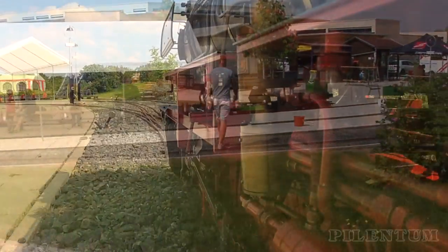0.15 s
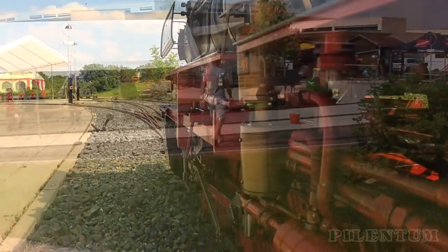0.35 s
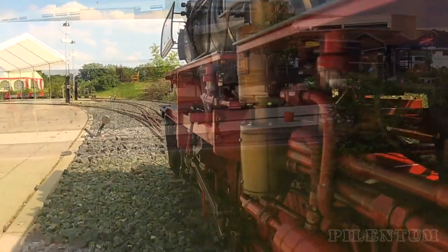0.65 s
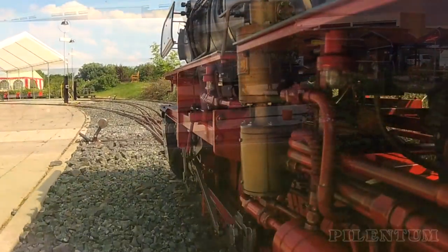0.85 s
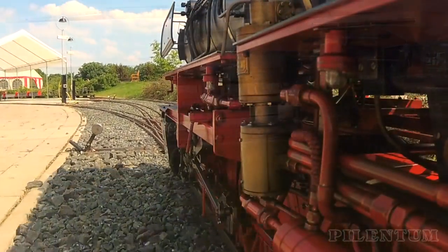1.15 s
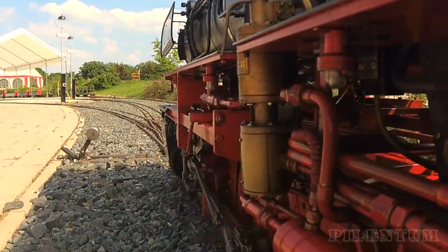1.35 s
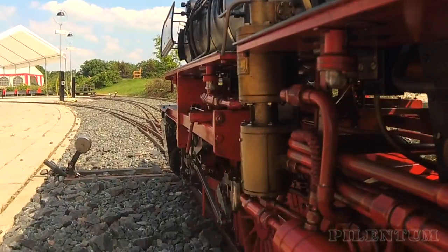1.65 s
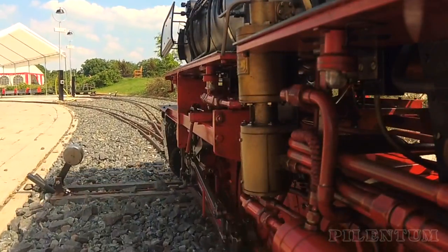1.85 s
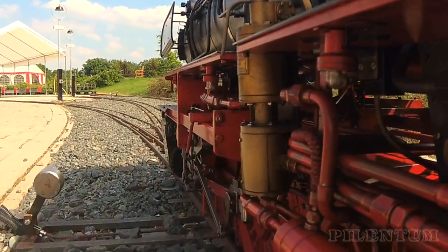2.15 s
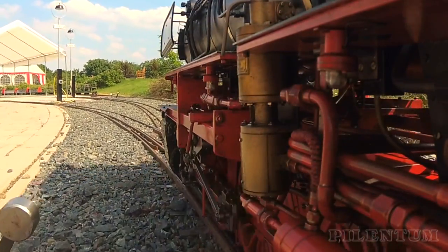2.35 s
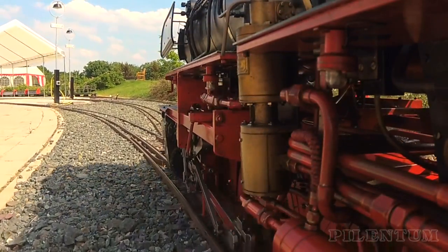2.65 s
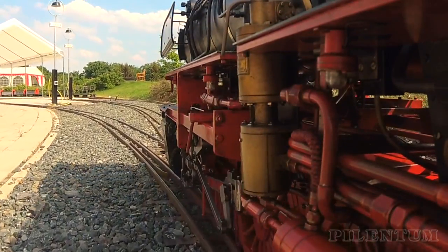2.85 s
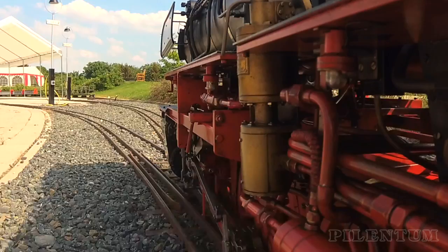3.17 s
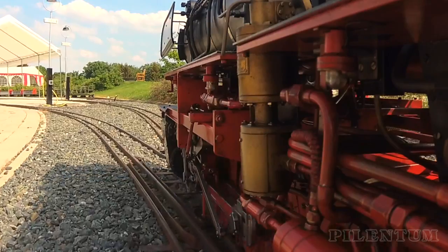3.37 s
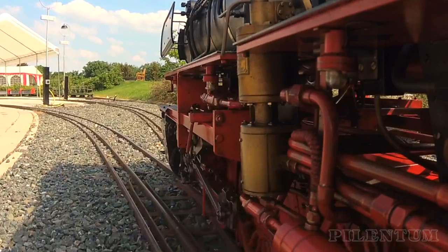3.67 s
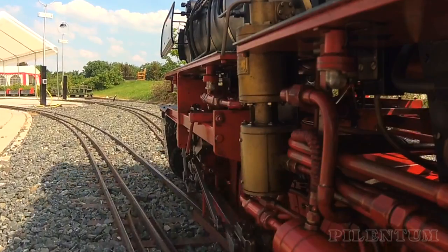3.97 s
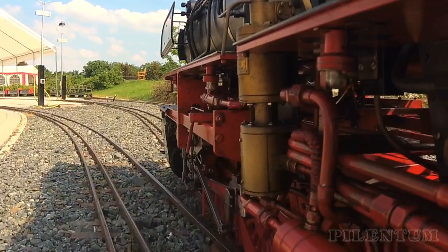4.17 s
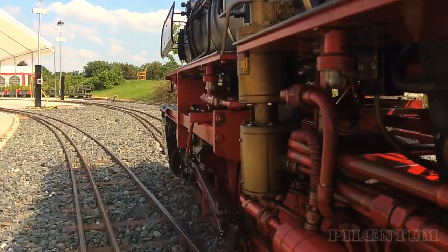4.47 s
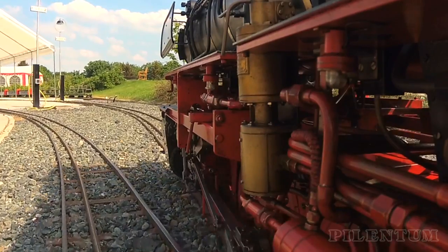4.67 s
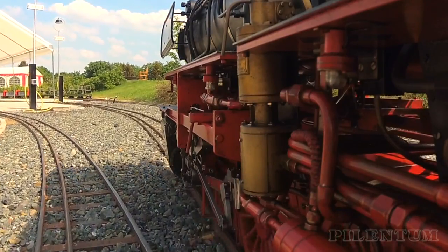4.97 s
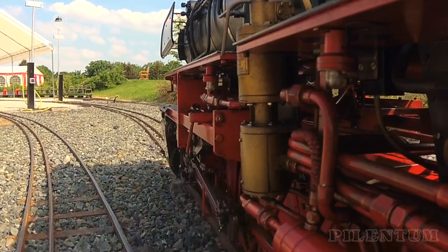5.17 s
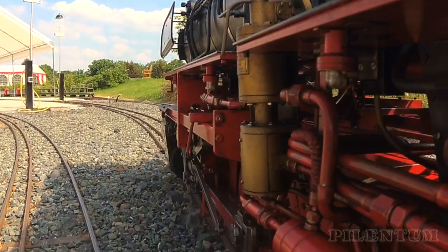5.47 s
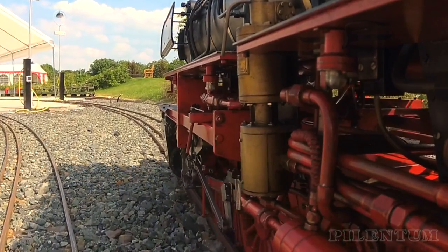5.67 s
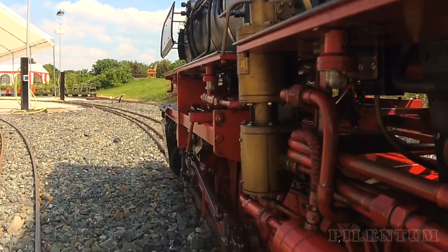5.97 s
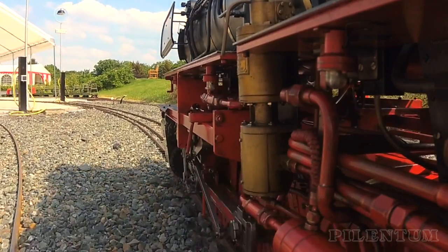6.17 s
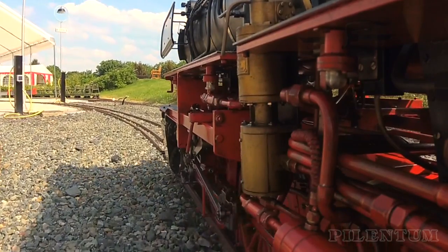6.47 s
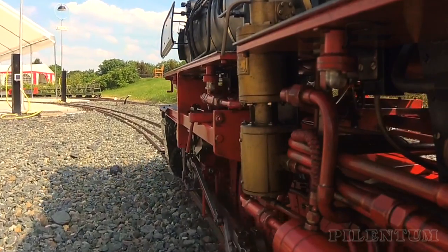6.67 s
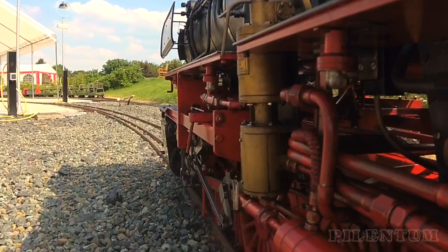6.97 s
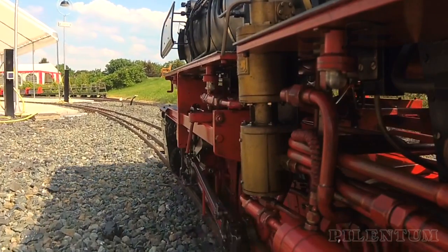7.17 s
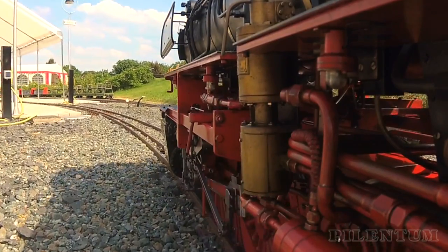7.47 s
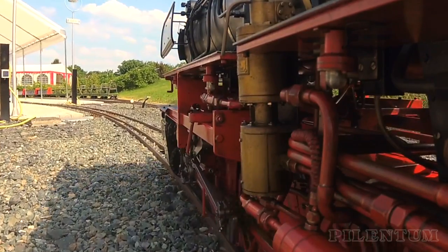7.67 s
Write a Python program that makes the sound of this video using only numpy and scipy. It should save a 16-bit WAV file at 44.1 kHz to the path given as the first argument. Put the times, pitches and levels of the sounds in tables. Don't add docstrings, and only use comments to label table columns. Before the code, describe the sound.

Outdoors, a miniature steam locomotive's passing rumble and airy hiss fade within about a second, revealing its running gear from a microphone mounted against the frame. Muffled wheel roughness pulses quickly with the rods, broken by irregular knocks, clanks and little clinks. A cluster of hard blows peaks at three and a half seconds, then rolling calms, with thin steam hiss, brief brake scrapes and faint very high flange squeak to the end.

```python
import sys
import numpy as np
from scipy import signal
from scipy.fft import rfft, irfft
from scipy.io import wavfile
from scipy.ndimage import uniform_filter1d, map_coordinates

SR = 44100
rng = np.random.default_rng(int(sys.argv[2]) if len(sys.argv) > 2 else 0)


def makeup_ratio(level_db):
    decades = np.asarray(level_db, float) / 20
    return 10 ** decades


def store_pcm(level_fs):
    pcm = np.round(np.clip(level_fs, -1, 1) * 32767).astype(np.int16)
    wavfile.write(sys.argv[1], SR, np.atleast_2d(pcm).T)


N = 345303
T = np.arange(N) / SR
CASE_HZ, TOP_HZ = 1800, 14400


def unit(x):
    return x / np.sqrt(np.mean(x ** 2))


def curve(rows):
    s, *columns = np.transpose(rows)
    return [np.interp(T, s, c) for c in columns]


def walk(rate):
    hold = int(SR / rate)
    steps = np.repeat(rng.standard_normal(N // hold + 1), hold)
    return 1.3 * uniform_filter1d(uniform_filter1d(steps, hold), hold)[:N]


def rough(rate, scatter_db, smear_ms):
    sizes = makeup_ratio(scatter_db * np.minimum(rng.exponential(size=N), 3))
    hits = (rng.random(N) < rate / SR) * sizes
    pole = np.exp(-1000 / (smear_ms * SR))
    return unit(np.sqrt(signal.lfilter([1], [1, -pole], hits ** 2) + 1e-9))


def shake(steady, s, db, ms, rise, strike):
    chatter, first = steady + np.zeros(N), np.zeros(N)
    for at, size, length in zip(s, makeup_ratio(db), np.clip(ms, 1, 60) / 1000):
        u = np.arange(int(3 * length * SR)) / SR / length
        shape = size * (1 - np.exp(-u / rise)) ** 2 * np.exp(-u ** 2)
        k = int(at * SR)
        chatter[k:k + len(u)] += shape[:N - k]
        first[k] += strike * size
    return chatter * rng.standard_normal((2, N)) + first


def ring(force, modes, lag, apart, top_hz):
    f = np.fft.rfftfreq(16384, 1 / SR) + 1e-3
    gain = np.zeros((2, len(f)), complex)
    for k, (hz, width, db, pan_db) in enumerate(modes):
        one = 1j * f * width / (hz ** 2 - f ** 2 + 1j * f * width)
        level = makeup_ratio(db + np.array([[pan_db], [-pan_db]]) / 2)
        gain += (-1) ** k * level * one
    gain = np.abs(gain) / np.sqrt(1 + (f / top_hz) ** 12)
    fold = irfft(np.log(gain + 1e-6 * gain.max()))
    fold[:, 1:8192] *= 2
    gain = np.exp(rfft(fold[:, :8193], 16384))
    gain /= np.sqrt(np.mean(np.abs(gain.mean(0)) ** 2))
    gain *= np.exp(-2j * np.pi * f * (np.array([[0], [lag]]) + 32) / SR)
    apart = np.clip(apart, 0, 1)
    right = np.sqrt(1 - apart) * force[0] + np.sqrt(apart) * force[1]
    both = np.array([force[0], right])
    return signal.oaconvolve(both, irfft(gain), axes=1)[:, 32:N + 32]


def wheels(roll_db, stroke, grain):
    # (time [s], peak level [dB], thud level [dB], contact [ms])
    knocks = [(0.127, -16, -28, 17), (0.416, -13.5, -32, 7.4), (0.635, -15, -39, 75), (1.135, -10, -34, 26),
              (1.242, -14, -21, 3.7), (1.402, -8, -26, 5.4), (1.758, -7.5, -43, 9.4),
              (2.311, -10, -42, 4.3), (2.686, -14.5, -29, 73), (2.955, -15, -38, 72),
              (3.036, -10, -39, 9.2), (3.224, -13.5, -18, 4.8), (3.278, -8, -21, 4.6),
              (3.525, -6, -3.5, 11), (3.587, -8, -26, 5.5), (3.759, -17, -30, 23), (3.859, -7, -16.5, 8.3),
              (4.095, -36, -97, 23), (4.269, -11, -10.5, 4.2), (6.15, -16, -30, 51), (4.906, -16, -51, 32),
              (5.06, -12.5, -70, 16), (5.284, -15.5, -16, 7.4), (5.48, -13, -41, 2.6),
              (5.674, -11, -23, 3.6), (6.322, -11, -25, 6.2), (6.471, -6.5, -23, 9.7),
              (7.402, -10.5, -44, 2.4), (7.445, -9, -33, 22), (7.677, -13, -38, 21)]
    # (time [s], peak level [dB], thud level [dB], contact [ms])
    more_knocks = [(0.991, -12, -42, 6), (1.119, -15, -42, 4.6), (1.202, -17, -30, 5.3), (1.354, -15, -41, 4.3),
                   (1.537, -12, -48, 6), (1.657, -24, -41, 4.9), (1.713, -14, -38, 5.5), (1.812, -17, -41, 6),
                   (2.036, -13, -33, 6.6), (2.163, -15, -36, 4.6), (2.231, -17, -18, 4.5), (2.335, -11, -36, 4.5),
                   (2.749, -28, -44, 6), (2.971, -20, -38, 6), (3.189, -14, -32, 12), (3.443, -13, -36, 6),
                   (3.475, -13, -36, 6), (3.532, 4.5, -38, 6.7), (3.647, -15, -41, 4.4), (3.673, -13, -36, 7.8),
                   (3.813, -8, -26, 9.4), (3.927, -6.5, -43, 8.2), (4.147, -12, -25, 9.1), (4.174, -20, -21, 7.2),
                   (4.401, -12, -36, 4.9), (4.571, -22, -50, 7.1), (4.667, -19, -36, 6), (4.76, -17, -40, 4.8),
                   (4.802, -43, -43, 4.6), (5.09, -19, -32, 6), (5.11, -17.5, -34, 6.5), (6.454, -18, -36, 4.2),
                   (6.502, -15, -33, 6.6), (6.954, -23, -38, 7.4), (7.114, -24, -28, 3.7), (7.208, -15, -40, 14),
                   (7.376, -12.5, -36, 5.4)]
    # (frequency [Hz], width [Hz], level [dB], left minus right [dB])
    low_modes = [(77.7, 13, -4, 5), (156, 38, -7.5, 5.5), (179.3, 28, -2, 5), (224, 20, 1.5, 3.5),
                 (270.7, 19.7, -5, 4.5), (314.1, 23.4, 3, 3), (352.4, 58.5, -2.5, 3.5)]
    # (frequency [Hz], width [Hz], level [dB], left minus right [dB])
    mid_modes = [(441, 56, -6, 5.2), (534.3, 16.7, 0.5, 6.2), (573, 22, -1, 2.6), (635.2, 37.4, 1.5, 6.4),
                 (690.5, 34, -4.5, 8.7), (786, 57.2, -1.5, 4), (862, 40.6, -3.5, 5.6), (938, 40, -7, 3.9),
                 (1037.5, 52, -9.5, 6.3)]
    s, knock_db, thud_db, ms = np.transpose(knocks + more_knocks)
    low_db = -28.5 + 0.85 * (roll_db - roll_db.mean()) - 12 * np.exp(-T / 0.7) + 2.0 * stroke
    low = shake(makeup_ratio(low_db + 1.16 * walk(12)), s - .003, thud_db, 1.6 * ms, rise=0.099, strike=2.4)
    rolling = makeup_ratio(roll_db - 1.5 + 0.65 * stroke) * grain
    mid = shake(rolling, s - .001, knock_db - 9.5, ms, rise=0.073, strike=16)
    return (ring(low, low_modes, lag=1.7, apart=0.022, top_hz=CASE_HZ)
            + ring(mid, mid_modes, lag=1.0, apart=0.042, top_hz=CASE_HZ))


def rods(roll_db, stroke, grain, pins, flecks):
    # (time [s], peak level [dB], edge level [dB], contact [ms])
    clanks = [(0.126, -13.5, -28, 7.8), (0.414, -9.5, -21, 6.5), (0.441, -16, -28, 12),
              (0.674, -18.5, -31, 20), (1.203, -12, -35, 6.9), (1.438, -17, -42, 15), (1.768, -14, -52, 17),
              (2.0432, -8.5, -34, 7.1), (2.3813, -14, -39, 9.1), (2.69, -15, -37, 34),
              (2.9735, -17, -36, 50), (3.1942, -16, -33, 16), (3.2234, -8, -34, 11),
              (3.2795, -1.5, -25, 9.9), (3.53, 1.5, -11, 14), (3.558, -3.5, -31, 8.2),
              (3.589, -11.5, -34, 20), (3.8128, -8, -30, 5.4), (3.857, -18, -26, 13),
              (3.928, -6.5, -29, 5.2), (4.2, -12.5, -38, 3.3), (4.9263, -15, -39, 8.2),
              (5.252, -20.5, -38, 11), (5.459, -11.5, -36, 12.6), (5.805, -14.5, -46, 15),
              (6.5042, -19, -34, 5.6), (6.7125, -13.5, -38, 18), (6.74, -14, -47, 34),
              (6.823, -17, -44, 8.9), (7.112, -13.5, -31, 9.6)]
    # (time [s], peak level [dB], edge level [dB], contact [ms])
    taps = [(0.149, -14, -31, 8.9), (.875, -18, -32, 14), (.997, -18, -45, 23), (1.12, -18.5, -46, 12),
            (1.399, -23, -48, 7), (1.658, -20, -51, 5.1), (2.349, -22, -39, 24), (2.618, -21, -39, 54),
            (3.243, -12.5, -30, 8.7), (3.311, -18, -37, 8.6), (3.444, -24, -36, 4),
            (3.645, -11.5, -49, 5.4), (4.262, -21, -34, 11), (4.451, -18, -37, 8.6), (4.8, -26, -32, 6),
            (5.06, -21, -44, 13), (5.87, -15, -39, 11), (6.44, -23.5, -42, 50), (6.768, -18, -52, 33),
            (7.401, -25, -46, 3.8), (7.668, -16, -45, 14), (7.693, -27, -35, 6), (7.045, -31, -42, 7),
            (5.441, -15, -34, 9), (4.57, -25, -51, 20)]
    # (time [s], peak level [dB], edge level [dB], contact [ms])
    clinks = [(0.2014, -20, -36, 7.3), (0.2745, -15, -36, 4.9), (1.279, -17, -44, 4.5),
              (1.3094, -26, -47, 6), (1.598, -20, -53, 6), (1.717, -21, -47, 5.4), (1.9834, -32, -42, 6.6),
              (2.142, -24, -39, 6), (2.4917, -21, -41, 6.8), (2.9572, -24, -41, 6), (3.0919, -22, -40, 5),
              (3.493, -17, -42, 4.5), (3.7694, -19, -42, 6), (3.7943, -28, -45, 3.4),
              (3.8921, -21, -36, 7.7), (3.9775, -20, -47, 5.1), (4.0248, -35, -52, 4.4),
              (4.1031, -37, -57, 4.6), (4.3582, -16.5, -43, 5), (5.0903, -24, -46, 6),
              (5.3957, -16.5, -45, 4.7), (6.9414, -19, -54, 6), (7.3702, -20, -50, 4.3),
              (7.446, -24, -40, 3.6), (7.647, -19, -41, 6)]
    # (frequency [Hz], width [Hz], level [dB], left minus right [dB])
    upper_modes = [(1235.6, 82, 3, 7.15), (1327.4, 58, -2, 11), (1500.3, 63, 2.5, 2.3), (1660, 57, -26, 16)]
    # (frequency [Hz], width [Hz], level [dB], left minus right [dB])
    edge_modes = [(1924, 60, -1.5, 0.67), (2236, 29.6, 4.5, 0.57), (2396, 168, 0.5, 1.5),
                  (2740, 182, -1.5, 3.1)]
    s, clank_db, edge_db, ms = np.transpose(clanks + taps + clinks)
    play = makeup_ratio(roll_db - 7.0 + 1.6 * stroke) * (grain + pins) / 2
    upper = shake(play, s - .001, clank_db - 9.0, ms, rise=0.067, strike=14)
    fizz = makeup_ratio(roll_db - 22.5 + 1.1 * stroke) * (.6 * pins + 0.22 * flecks)
    edge = shake(fizz, s - .002, edge_db - 5.5, ms, rise=0.11, strike=3.1)
    return (ring(upper, upper_modes, lag=5.5, apart=0.055, top_hz=CASE_HZ)
            + ring(edge, edge_modes, lag=2.0, apart=0.48, top_hz=2 * CASE_HZ))


def steam_and_bare_metal(stroke, flecks):
    # (time [s], level [dB])
    steam = [
        (.5, -69),
        (.72, -52.5),
        (2.9, -51),
        (4.1, -54),
        (5.0, -53.5),
        (5.7, -50.5),
        (7.2, -50.5),
        (7.55, -50),
        (7.83, -49.5),
    ]
    # (time [s], peak level [dB], top level [dB], contact [ms])
    ticks = [(0.052, -35.5, -47, 6.9), (0.1211, -37, -44, 15), (0.411, -38, -55, 16),
             (0.435, -33, -56, 10.5), (0.6429, -40, -54, 9.6), (0.6749, -40, -53, 15),
             (0.872, -36, -46, 5.5), (1.1638, -48, -42, 20), (1.4386, -46, -61, 12), (1.7639, -49, -60, 9),
             (1.9964, -47, -35, 7.8), (2.3864, -49, -34, 8.7), (2.7416, -45, -67, 12), (2.98, -40, -45, 16),
             (3.226, -33.5, -55, 8.4), (3.277, -35, -52, 14), (3.4406, -46, -58, 8.1),
             (3.5266, -28, -41, 10), (3.536, -16, -33, 6.9), (3.5857, -41, -52, 14),
             (3.6102, -43, -56, 6.6), (3.814, -46, -57, 6.2), (3.867, -28, -55, 8.1), (3.929, -45, -52, 9),
             (4.2009, -43, -79, 9.4), (4.4034, -48, -31, 19), (4.4478, -48, -56, 5.6),
             (4.803, -47, -63, 3.2), (5.441, -49, -41, 8.5), (7.648, -49, -46, 11)]
    # (time [s], peak level [dB], contact [ms])
    flicks = [(0.1471, -35, 4), (0.2433, -35, 4), (0.7677, -26, 4.6), (1.1443, -30, 4), (1.1895, -32, 4),
              (1.3902, -34, 5), (1.4594, -40, 4), (2.0368, -34, 4), (2.0787, -35, 4), (2.1221, -35, 4),
              (2.4663, -37, 4.6), (2.4917, -45, 3.7), (2.9654, -38, 4), (3.0385, -33, 4), (3.5544, -25, 3),
              (3.6426, -43, 4), (3.7234, -46, 4), (3.8122, -31, 4), (4.135, -42, 4), (4.1824, -37, 3.4),
              (4.3575, -41, 4), (4.9726, -37, 5), (5.0614, -35, 4.4), (5.2111, -35, 4.3), (5.456, -31, 4),
              (6.4572, -36, 4), (6.8264, -37, 4), (7.5348, -33, 4)]
    # (frequency [Hz], width [Hz], level [dB], left minus right [dB])
    high_modes = [(3018, 53.8, 1.5, 5.2), (3553, 237, 0, 7.62), (3846, 56, 3.5, 7.2), (4033, 171, -3, 3.4),
                  (4845, 224, -5, 2.1), (5090, 254, -8, 13.3), (5665, 420, -9.5, 6), (6270, 380, -10, 4.6),
                  (7320, 990, -16, 5.6), (8480, 560, -13, 9.1), (10200, 1960, -16.5, 7.9),
                  (12400, 2000, -19, 9.7)]
    tick_s, tick_db, top_db, tick_ms = np.transpose(ticks)
    flick_s, flick_db, flick_ms = np.transpose(flicks)
    hiss = makeup_ratio(curve(steam)[0] + 1.4 * stroke + 0.47 * walk(20)) * (0.85 + 0.21 * flecks)
    high = shake(hiss, tick_s - .005, tick_db + 5.0, tick_ms, rise=0.37, strike=0.47)
    high = high + shake(0, flick_s - .001, flick_db - 7.5, flick_ms, rise=0.1, strike=1.8)
    top = shake(0, tick_s - .004, top_db, 0.4 * tick_ms, rise=0.98, strike=.3)
    return (ring(high, high_modes, lag=4.7, apart=0.96, top_hz=TOP_HZ)
            + ring(top, [(10500, 5000, 0, 10)], lag=3.0, apart=0.44, top_hz=13200))


def bracket():
    # (time [s], peak level [dB], contact [ms])
    pings = [(0.3094, -34, 4), (0.3636, -38, 4), (0.413, -35, 3.6), (0.4339, -22, 4.4), (0.6379, -31, 4.3),
             (0.7457, -29, 4), (1.2491, -38, 4), (1.3897, -40, 4), (1.4965, -40, 4), (1.5773, -55, 4),
             (1.7564, -35, 4), (1.8667, -39, 4), (1.9076, -62, 4), (1.9415, -37, 4), (2.0901, -36, 4),
             (2.5152, -33, 4), (2.7442, -31, 4), (3.1043, -33, 5.2), (3.1487, -31, 4), (4.1394, -43, 4),
             (4.1924, -46, 4), (4.2273, -38, 4), (4.4478, -33, 5.1), (4.571, -38, 4), (4.6453, -39, 4),
             (4.8424, -42, 4), (4.8813, -38, 4.6), (4.9207, -30, 4.6), (5.2545, -37, 4), (5.5742, -32, 4.7),
             (6.3994, -38, 4), (6.4592, -34, 4), (6.7111, -30, 4.5), (6.737, -37, 4), (6.754, -36, 4),
             (6.7794, -36, 4), (6.8294, -33, 4), (7.0703, -41, 4), (7.1631, -36, 4)]
    # (frequency [Hz], width [Hz], level [dB], left minus right [dB])
    bracket_modes = [(1850, 150, 0, -2), (2430, 130, 6.5, 7), (2630, 250, -0.5, 4)]
    s, db, ms = np.transpose(pings)
    force = shake(0, s - .001, db - 5.0, ms, rise=0.12, strike=8.1)
    return ring(force, bracket_modes, lag=1.9, apart=0.16, top_hz=2 * CASE_HZ)


def brake_shoe():
    # (time [s], peak level [dB], contact [ms])
    scrapes = [
        (1.2, -29, 10),
        (4.45, -28, 6),
        (5.254, -31, 9),
        (6.502, -29, 7),
        (6.711, -28, 12),
        (6.738, -27, 35),
        (6.826, -29, 8),
        (7.113, -31, 6.9),
    ]
    # (frequency [Hz], width [Hz], level [dB], left minus right [dB])
    shoe_modes = [(1780, 180, 1, 0), (2140, 220, -7, 2)]
    s, db, ms = np.transpose(scrapes)
    force = shake(0, s - .001, db - 3.5, ms, rise=0.093, strike=3.4)
    return ring(force, shoe_modes, lag=1.9, apart=0.2, top_hz=2 * CASE_HZ)


def gear():
    # (time [s], level [dB])
    roll = [(0, -27), (.5, -25), (1, -24.5), (1.45, -22), (1.85, -23.5), (2.3, -23.5), (2.9, -26),
            (3.3, -24.5), (3.8, -24), (4.2, -24.5), (4.45, -23.5), (5.1, -27), (5.55, -27), (6.1, -27.5),
            (6.7, -25), (7.05, -25.5), (7.45, -25), (7.83, -23)]
    # (time [s], turns done [turns])
    turns = [
        (-.12, -5),
        (1.15, 0),
        (2.7, 5),
        (3.86, 9),
        (4.8, 12),
        (8.1, 22),
    ]
    roll_db, = curve(roll)
    stroke = np.exp(2.2 * (np.cos(2 * np.pi * curve(turns)[0]) - 1)) - .3
    grain = rough(rate=700, scatter_db=2.0, smear_ms=3.5)
    pins = rough(rate=300, scatter_db=1.4, smear_ms=4.2)
    flecks = rough(rate=45, scatter_db=3, smear_ms=4)
    return (wheels(roll_db, stroke, grain) + rods(roll_db, stroke, grain, pins, flecks)
            + steam_and_bare_metal(stroke, flecks) + bracket() + brake_shoe())


def sway(x, patchy_db):
    hz, _, z = signal.stft(x, SR, nperseg=1024)
    frames = z.shape[2]
    chance = uniform_filter1d(rng.standard_normal((24, frames)), 5, axis=1) * np.sqrt(5)
    place = np.interp(np.log(hz + 1), np.log([300, 12000]), [0, 23])
    db = map_coordinates(chance, np.meshgrid(place, np.arange(frames), indexing="ij"), order=1)
    return signal.istft(z * makeup_ratio(patchy_db * db), SR, nperseg=1024)[1][:, :N]


def squeak():
    # (time [s], level [dB])
    fits = [(2.005, -60), (2.385, -53), (2.665, -61), (2.985, -63), (3.105, -50), (3.22, -53), (3.53, -52),
            (3.92, -62), (4.287, -49), (4.365, -51), (4.412, -51), (4.49, -56), (4.62, -117), (4.705, -55),
            (4.757, -52)]
    fit_s, rub_from_s, rub_swell_s = 0.011, 5.03, .05
    s, db = np.transpose(fits)
    press = makeup_ratio(-60) / (1 + np.exp(-np.clip((T - rub_from_s) / rub_swell_s * 4, -50, 50)))
    for at, size in zip(s, makeup_ratio(db)):
        press = press + size * np.exp(-((T - at) / fit_s) ** 2)
    rub = press * makeup_ratio(1.0 + 2.5 * walk(45)) * rng.standard_normal((2, N))
    whine = makeup_ratio(-76 + 2.8 * walk(6)) * np.sin(2 * np.pi * 11550 * T + .8 * walk(8))
    # (frequency [Hz], width [Hz], level [dB], left minus right [dB])
    modes = [(13100, 900, -11, 10), (13900, 150, 0, 9), (14150, 200, -2, 9)]
    return ring(rub, modes, lag=4.4, apart=.3, top_hz=TOP_HZ) + whine * makeup_ratio(np.array([[4], [-4]]))


def trackside():
    # (frequency [Hz], level [dB per Hz])
    passing = [(12, -32), (20, 1), (419, -7), (632, -6.5), (706, -16), (809, -17), (1520, -24), (1840, -23),
               (12500, -47.5), (14000, -53)]
    # (time [s], level [dB])
    fade = [
        (0, -22.5),
        (.2, -25.5),
        (.4, -27.5),
        (.6, -27.5),
        (.86, -28.5),
        (.92, -35),
        (1.1, -31.5),
        (1.35, -59),
    ]
    hz, db = np.transpose(passing)
    f = np.fft.rfftfreq(N, 1 / SR) + 1e-3
    mid, side = rfft(rng.standard_normal((2, N))) * makeup_ratio(np.interp(np.log(f), np.log(hz), db))
    wide = np.clip(f / 3000, .15, .8)
    air = unit(irfft(mid + wide * side * np.array([[1], [-1]]), N))
    throb_db = 1.5 * walk(25)
    return air * makeup_ratio(curve(fade)[0] + throb_db + np.array([[.8], [-.8]]))


def chirp():
    # (time [s], start [Hz], end [Hz], length [s], level [dB])
    fall = (.82, 6100, 5700, .045, -47)
    s, from_hz, to_hz, length, db = fall
    u = np.clip((T - s) / length, 0, 1)
    tone = np.sin(2 * np.pi * np.cumsum(from_hz + (to_hz - from_hz) * u) / SR)
    return makeup_ratio(db) * np.sin(np.pi * u) ** 2 * tone


def scene():
    frame = sway(gear(), patchy_db=0.84) * makeup_ratio(np.array([[.4], [-.4]]))
    return frame + squeak() + trackside() + chirp()


def low_pass(x):
    return signal.sosfilt(signal.butter(12, 14980, fs=SR, output="sos"), x)


def record(dry):
    top = .72
    x = signal.sosfilt(signal.butter(2, 42, "high", fs=SR, output="sos"), dry)
    x = x / (1 + (x / top) ** 6) ** (1 / 6)
    return low_pass(x)


dry = scene()
out = record(dry)
store_pcm(out)
```